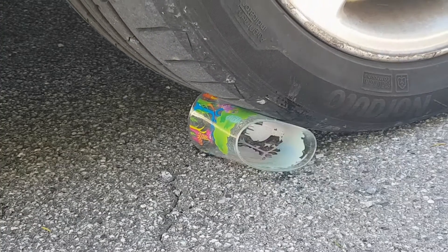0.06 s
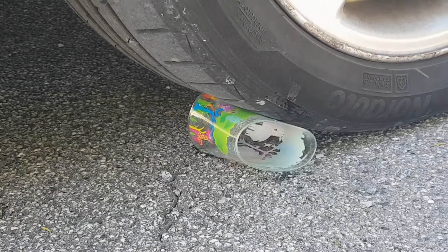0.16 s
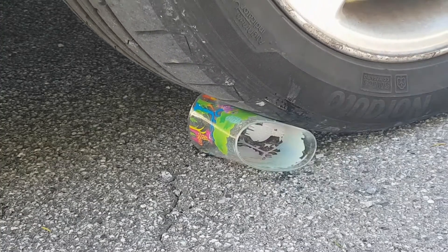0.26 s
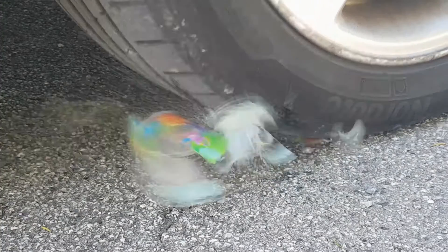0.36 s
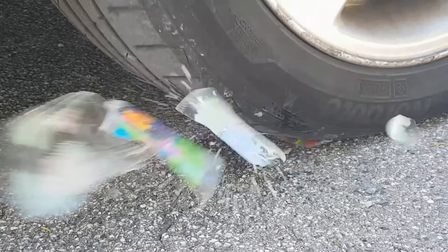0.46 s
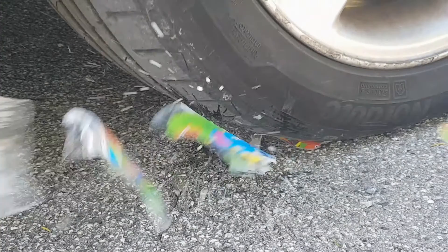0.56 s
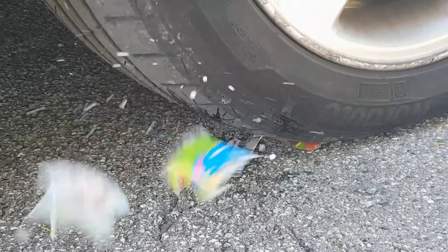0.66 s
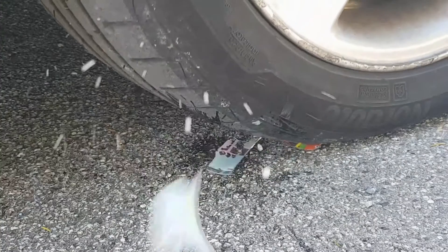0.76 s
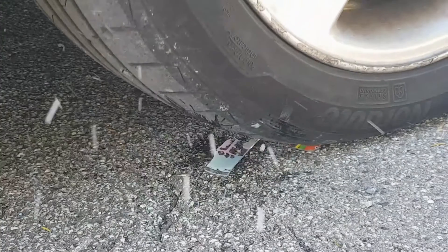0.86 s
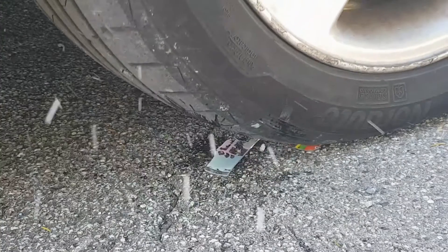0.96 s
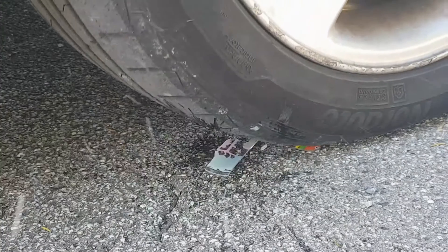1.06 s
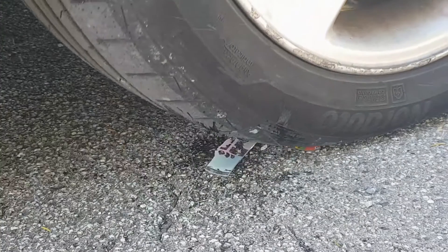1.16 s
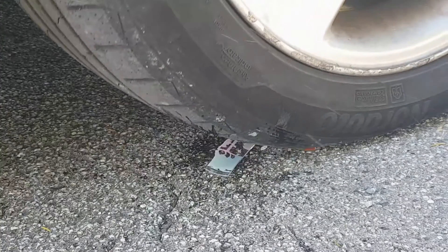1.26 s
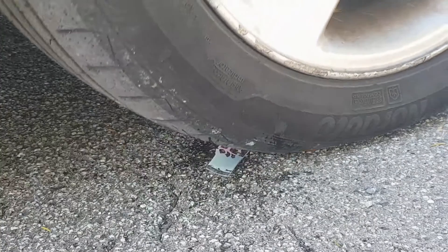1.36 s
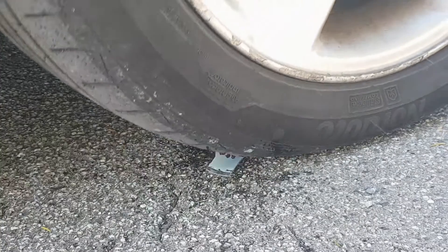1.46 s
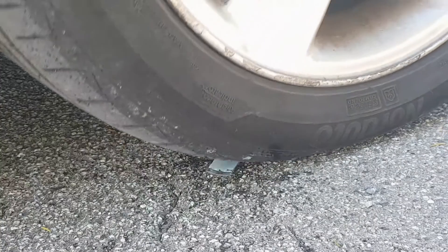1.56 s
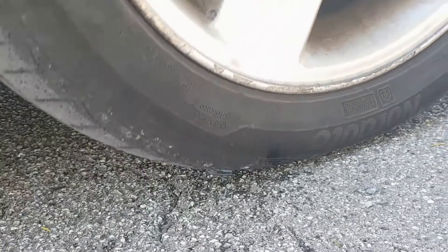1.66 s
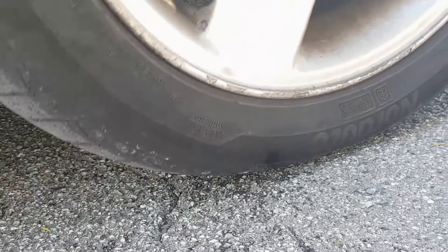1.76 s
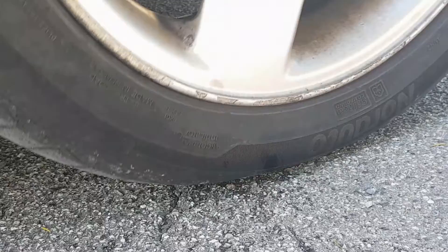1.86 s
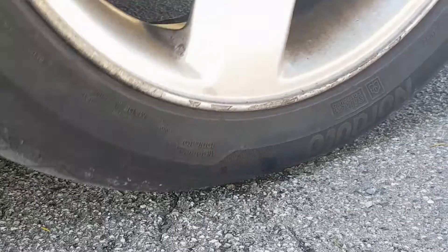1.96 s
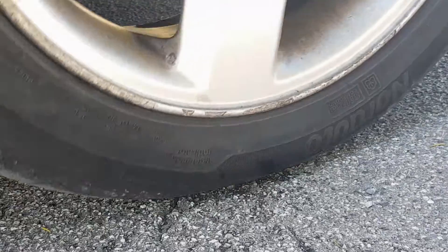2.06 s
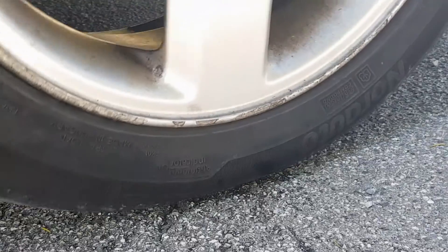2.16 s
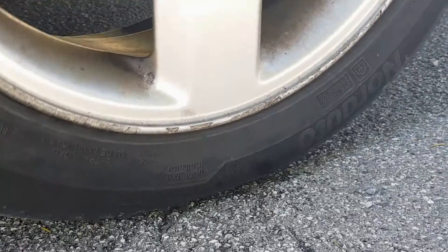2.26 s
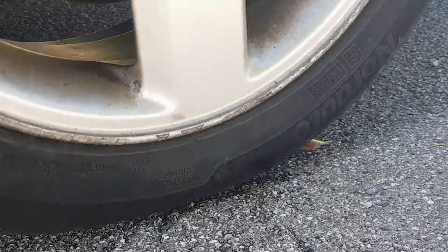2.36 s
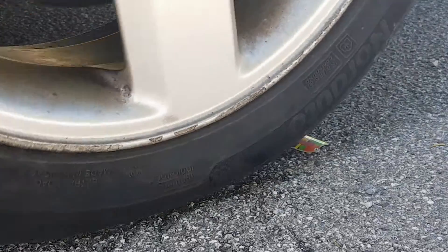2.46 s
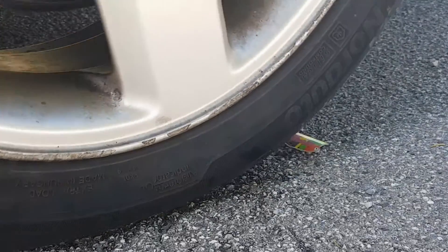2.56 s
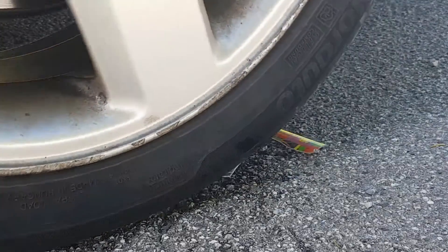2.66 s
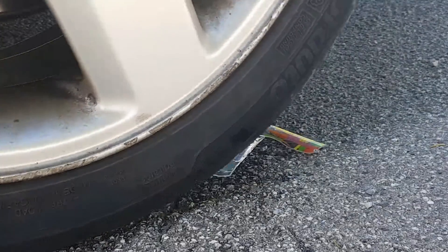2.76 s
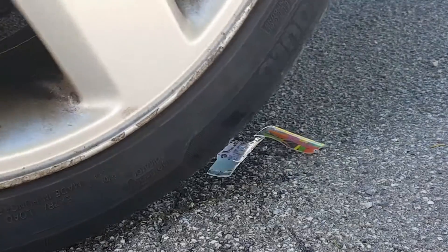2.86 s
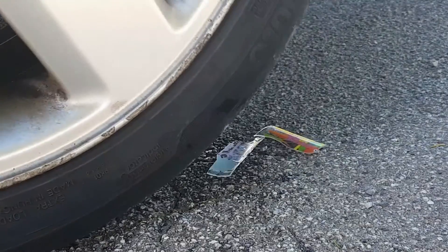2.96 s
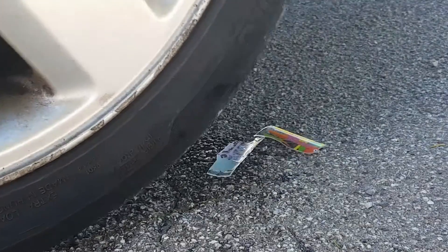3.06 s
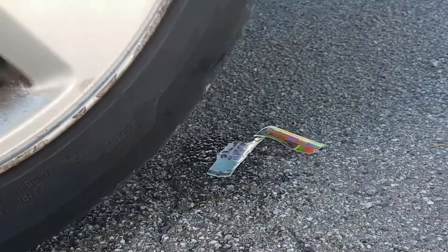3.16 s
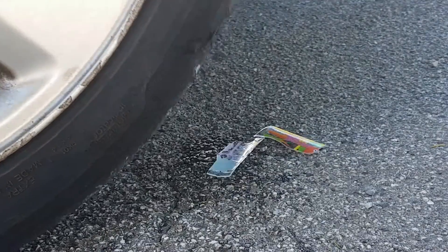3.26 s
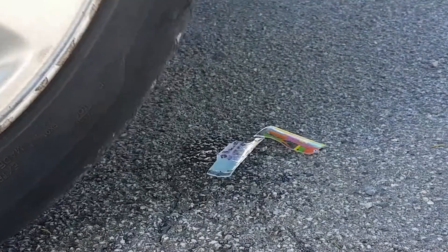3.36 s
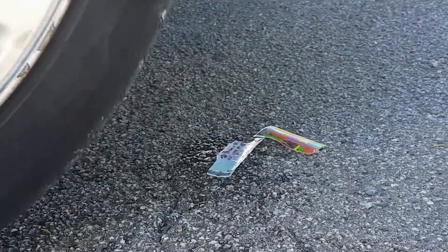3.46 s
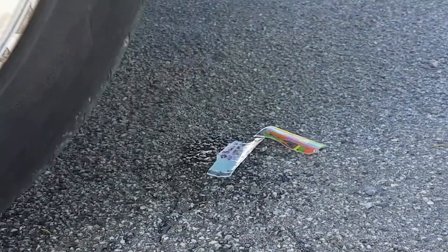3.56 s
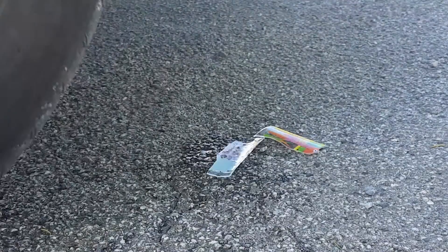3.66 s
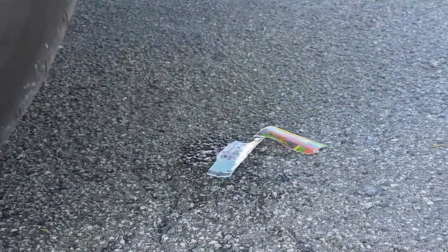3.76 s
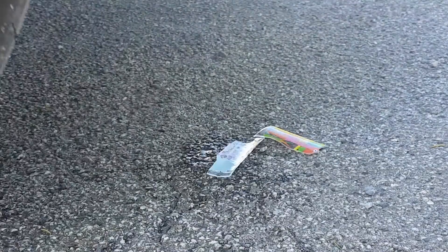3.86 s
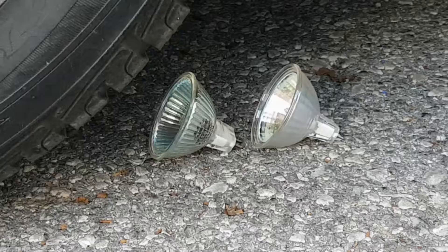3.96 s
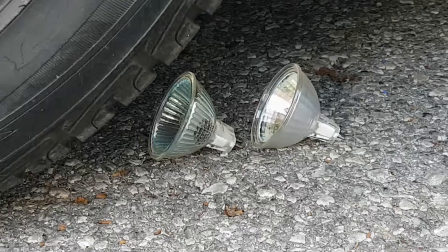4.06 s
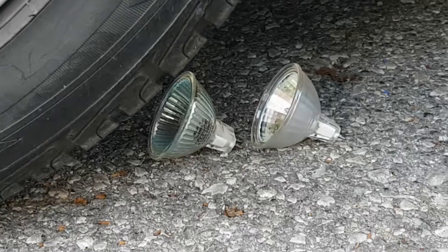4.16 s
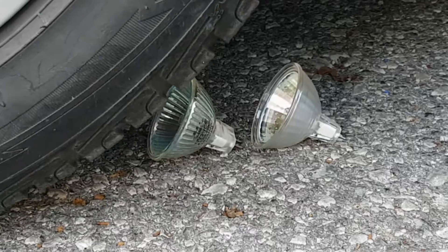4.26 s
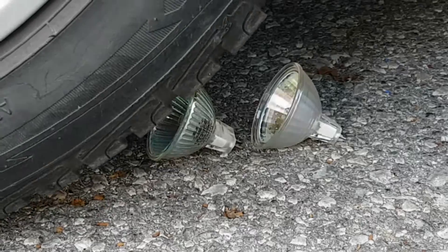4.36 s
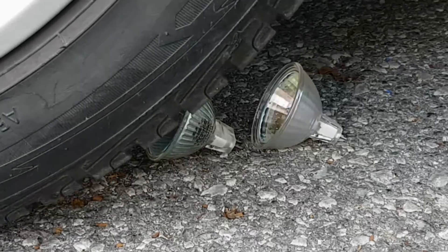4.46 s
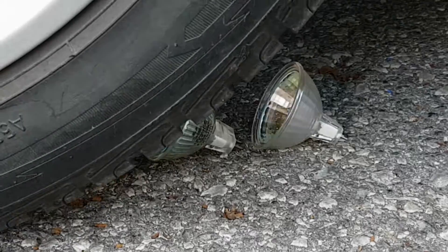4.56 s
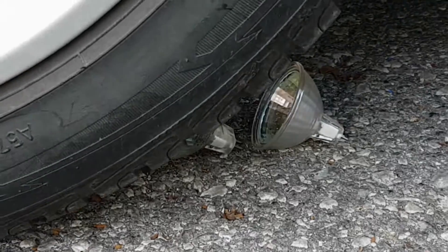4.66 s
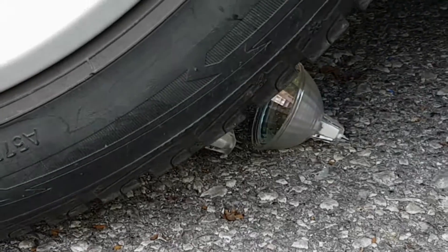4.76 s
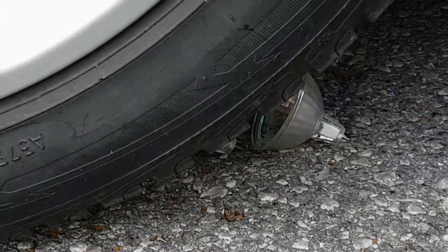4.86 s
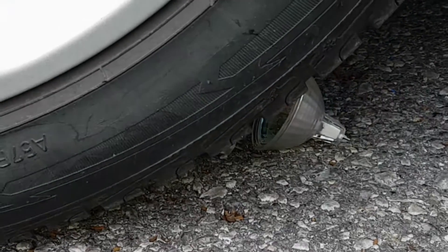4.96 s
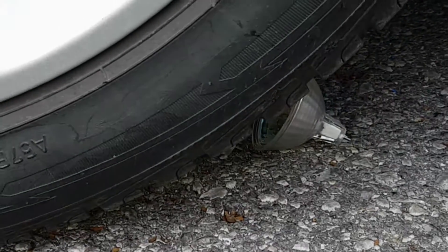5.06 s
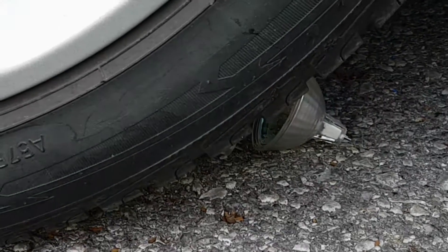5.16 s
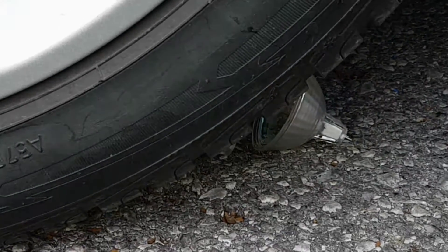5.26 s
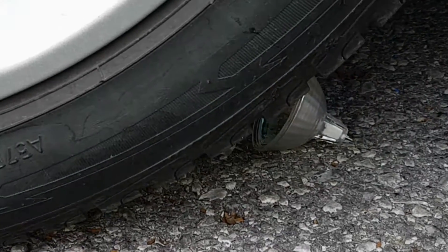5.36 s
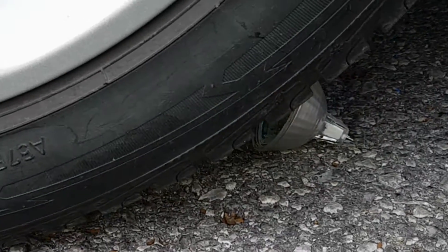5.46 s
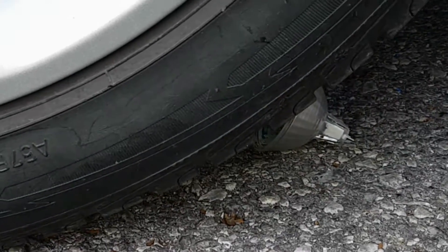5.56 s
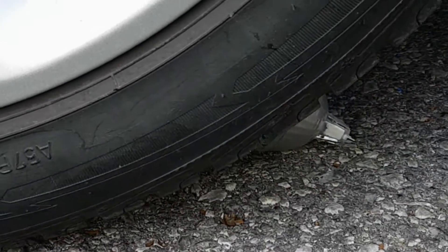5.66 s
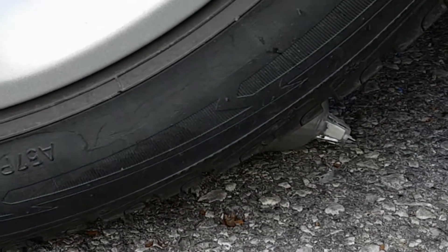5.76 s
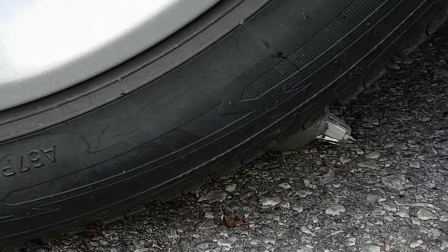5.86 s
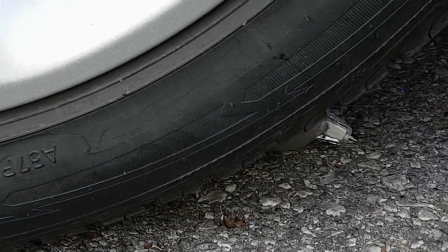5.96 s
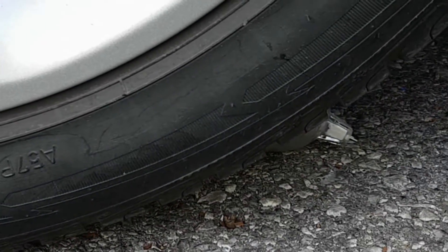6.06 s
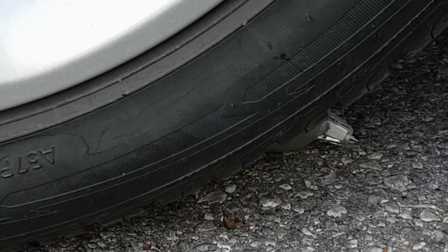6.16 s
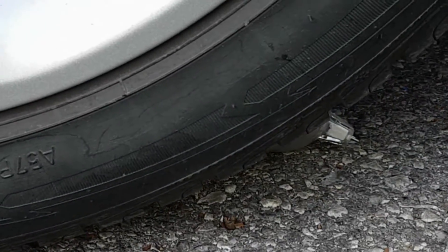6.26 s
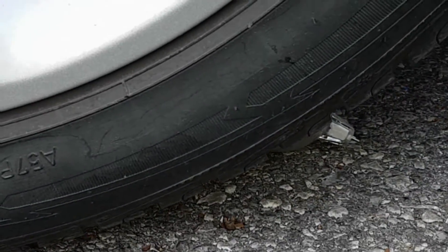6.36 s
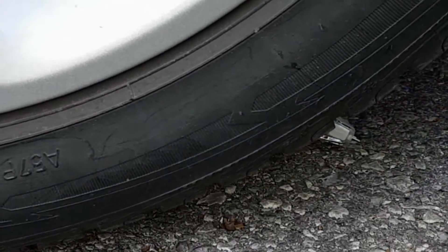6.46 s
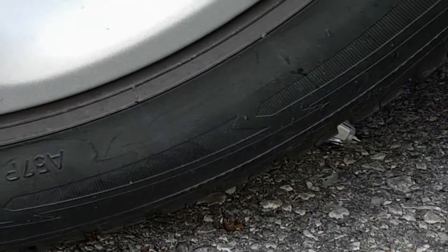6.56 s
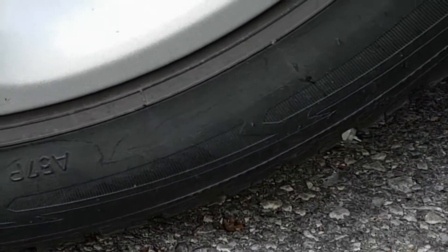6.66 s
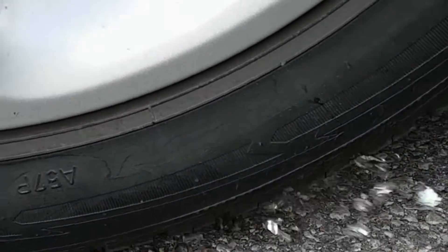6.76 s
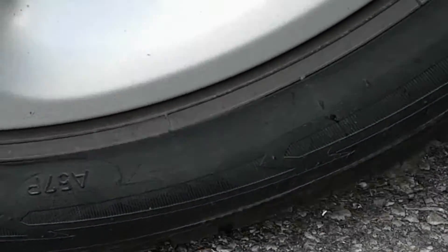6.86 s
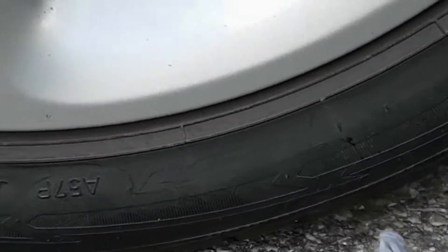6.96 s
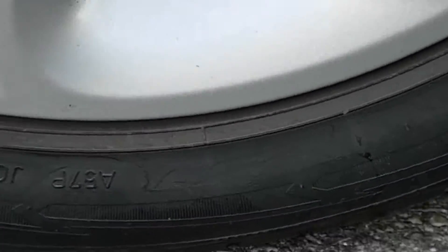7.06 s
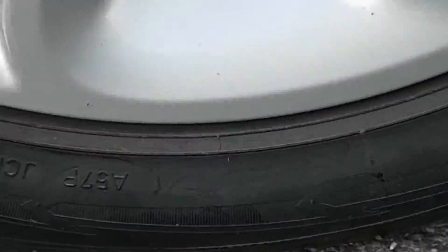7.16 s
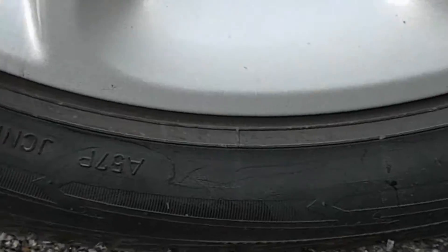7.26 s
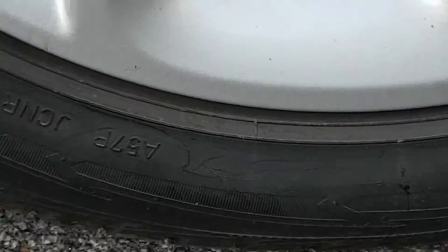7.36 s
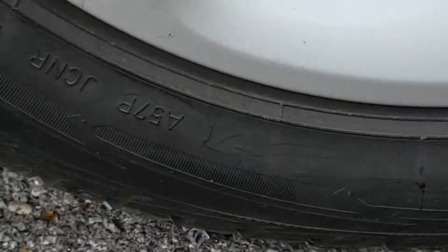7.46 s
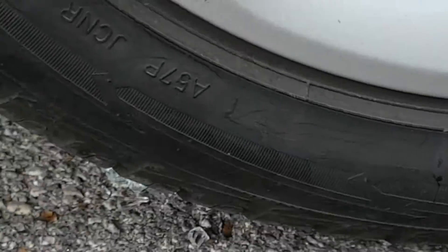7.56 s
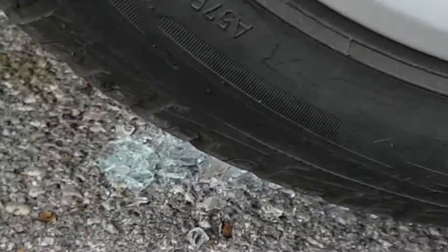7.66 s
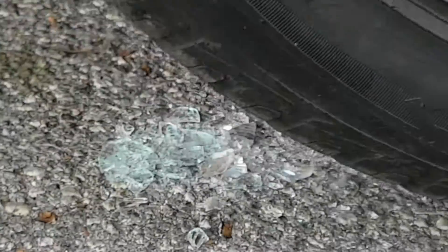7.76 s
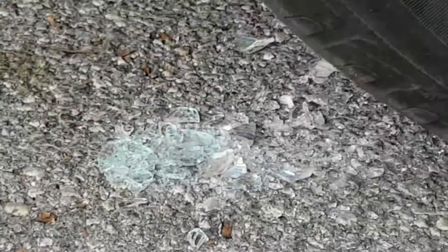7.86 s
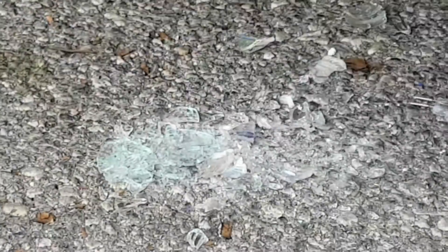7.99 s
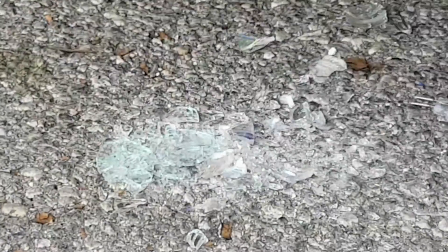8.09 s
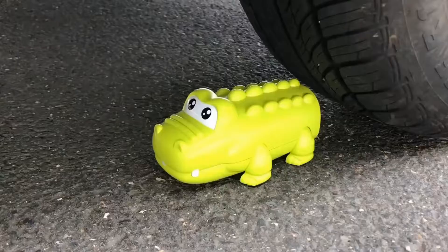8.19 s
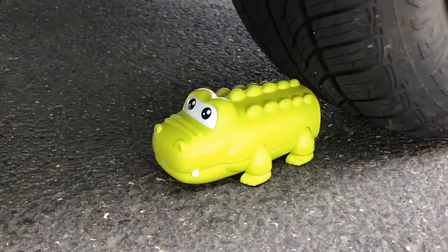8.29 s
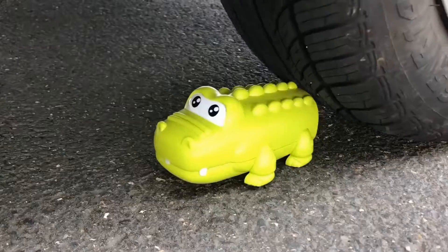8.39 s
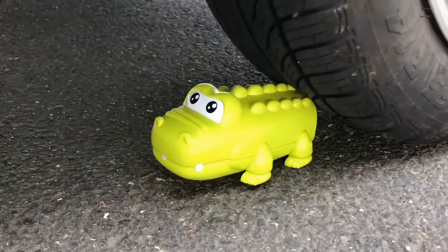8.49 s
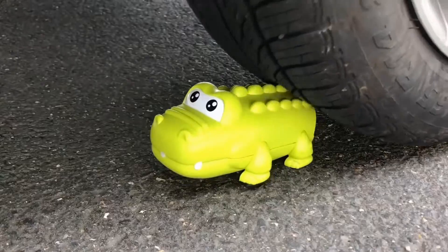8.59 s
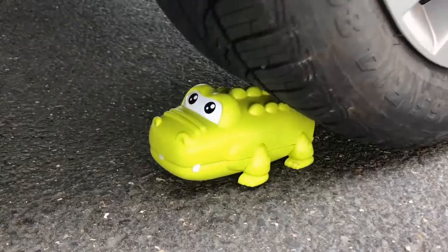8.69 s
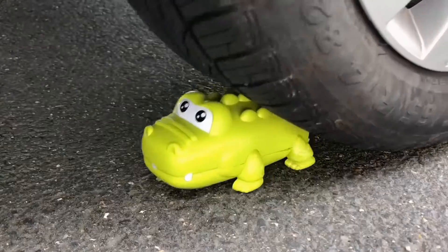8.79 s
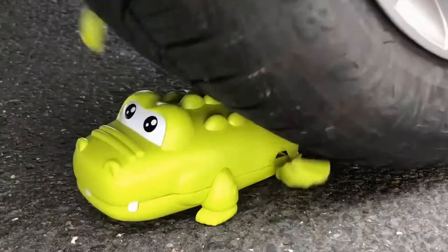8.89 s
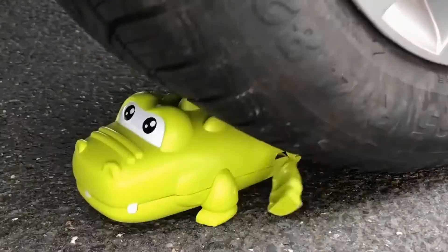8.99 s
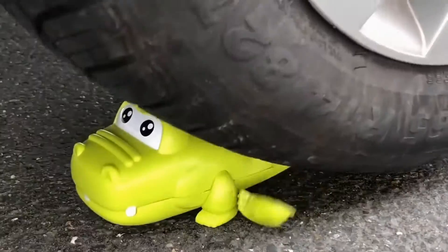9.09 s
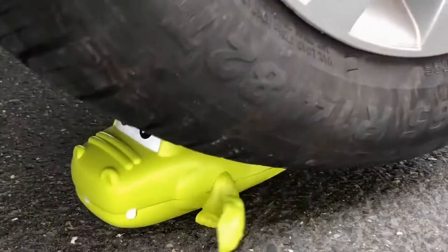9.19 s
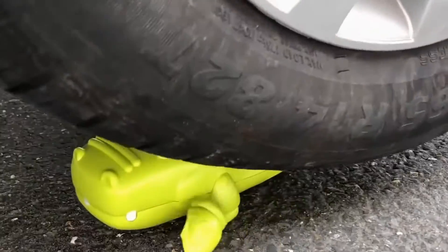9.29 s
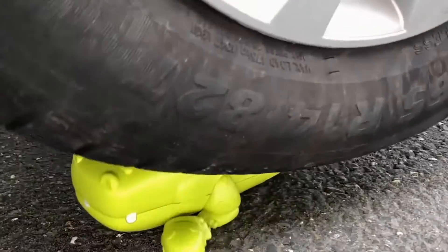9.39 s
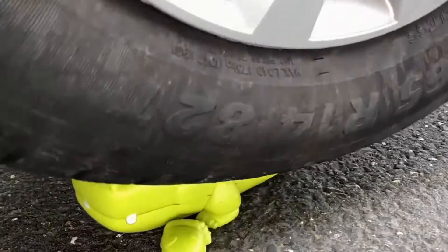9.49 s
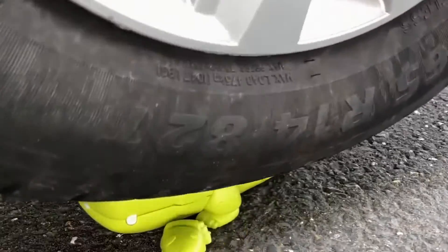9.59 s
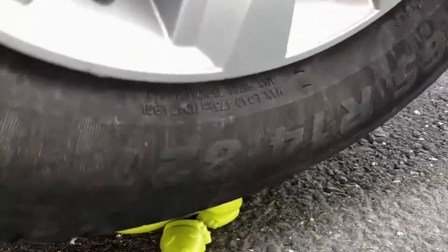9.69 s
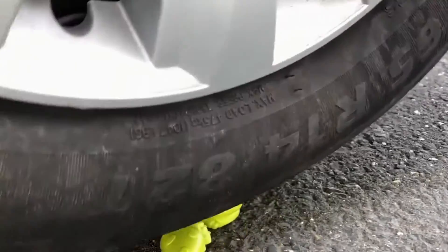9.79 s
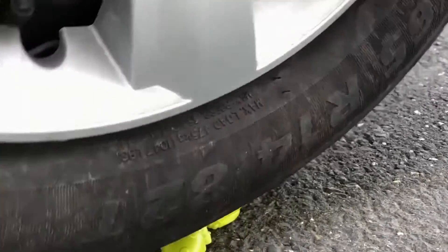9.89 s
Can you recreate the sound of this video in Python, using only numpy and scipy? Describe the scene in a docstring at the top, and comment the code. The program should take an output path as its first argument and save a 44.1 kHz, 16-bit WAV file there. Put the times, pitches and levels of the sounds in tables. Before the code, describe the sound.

A car tyre shatters a drinking glass and grinds its shards, pops two glass lamp reflectors beside an idling engine, then cracks a hollow plastic toy.

```python
"""A car tyre rolls slowly over things laid on asphalt, in three scenes.
First a drinking glass shatters: dense noise fractures, ringing pieces; its shards are ground under a groaning tread.
Then, beside an idling engine of firing tones and filtered noise, two glass lamp reflectors
pop as muffled noise bursts and squeal as wavering sines.
Last, in mono, a hollow plastic toy cracks, crumples and bursts: noise snaps ring the modes of its shell."""
import sys
import numpy as np
from scipy import signal
from scipy.fft import rfft, irfft
from scipy.io import wavfile

SR = 44100
rng = np.random.default_rng(int(sys.argv[2]) if len(sys.argv) > 2 else 0)


def dump_mix(stems):
    """Bounce the given channels to the path in sys.argv[1] as a 16-bit WAV at rate SR."""
    frames = np.atleast_2d(stems).T  # one column per channel
    limited = np.clip(frames, -1, 1)  # hard clip at full scale
    pcm = np.round(limited * 32767).astype(np.int16)
    wavfile.write(sys.argv[1], SR, pcm)


N = 437913
TIME = np.arange(N) / SR
LAMPS_START_S, TOY_START_S = 4.027, 8.31
CUTOFF_HZ = 16000

# All level_db columns are relative: the mix adds offsets.
# Glass wall strains, snaps, pours down, settles: start_s, level_db, attack_s, hold_s, release_s
WALL_BREAK = [(0.345, -31.5, 0.067, 0.026, 0.11), (0.387, -14, 0.066, 0.0036, 0.13),
              (0.42, -23.5, 0.2, .06, 0.24), (0.56, -42.5, .2, 0.064, 0.45)]
# Thick base grinds, then snaps: start_s, level_db, attack_s, hold_s, release_s
BASE_BREAK = [(1.13, -44, 0.18, 0.19, 0.52), (1.241, -21, 0.19, 0.00281, 0.058)]
# Spectrum of the breaking wall: freq_hz, density_db (per Hz)
SHATTER_COLOUR = [(200, -9.5), (400, -3.5), (980, -5.5), (1230, -0.5), (1550, -5), (2300, -9),
                  (3600, -13.5), (5000, -22), (7700, -13), (10000, -29), (13000, -15), (16000, -24)]
# Spectrum of the breaking base: freq_hz, density_db (per Hz)
BASE_COLOUR = [(200, -25.5), (650, 1), (1150, -1.5), (2000, -2), (3000, 6.5), (4600, -29.5), (6500, -4.5),
               (9000, -22), (16000, -18.5)]
# Largest glass pieces, resonances: freq_hz, width_hz, level_db
PIECES = [(486, 48, -5.5), (647.5, 8.3, 0.5), (1213, 40, 3.5), (1316, 60, 0), (2064, 70, -4),
          (3660, 94, -5.5)]
# Pieces spring free, then land: start_s, level_db, attack_s, hold_s, release_s
PIECE_RINGING = [(0.385, -23, .1, .07, .28), (0.575, -41, .1, .04, .42)]
# Single shards giving way: centre_s, level_db, pitch_hz, length_s
CHINKS = [(0.228, -53, 5450, 0.0083), (0.944, -54, 5160, 0.0056), (1.402, -32.5, 2900, 0.0022),
          (1.428, -31.5, 2970, 0.0034), (2.225, -36, 1860, 0.012), (2.33, -35.5, 2100, 0.0046),
          (2.56, -44, 7000, 0.01)]
# Tyre drops on to the road: start_s, level_db, attack_s, hold_s, release_s, pitch_hz
DROPS = [(0.405, -38.5, 0.15, 0.03, 0.2, 73.9), (0.49, -34.5, 0.19, 0.025, 0.26, 142.2),
         (0.685, -46, 0.17, 0.018, 0.23, 235), (1.225, -37, 0.25, 0.013, 0.14, 232)]
DROP_OCTAVES_PER_S = 7
# Rubber groaning on the road: time_s, pitch_hz, level_db
GROAN = [(0.2, 738, -54.5), (0.899, 760, -74), (1.351, 876, -47), (1.621, 829.6, -76), (2.205, 820, -37.5),
         (2.492, 817.6, -32.5), (2.57, 745, -45), (3.6, 627, -40.5), (3.97, 624, -79.5)]
# Groan cluster: pitch_ratio, level_db
GROAN_TONES = [(0.72, -9), (1, 1.5), (1.2, -5)]
# Tread creeping against the glass, two spans: time_s, rumble_db, hiss_db
CREEP = [
    [(0.0, -49.5, -57), (0.26, -55.5, -60.5), (0.28, -54, -68)],
    [(0.82, -70.5, -75), (0.928, -59.5, -61), (1.06, -62.5, -74)],
]
# Tread rolling off over grit: time_s, rumble_db, hiss_db
ROLL = [(1.47, -54, -54.5), (1.64, -62.5, -63.5), (2.189, -44, -47), (2.21, -41, -44.5), (2.57, -36, -38),
        (2.6, -40, -42.5), (3.53, -38.5, -41), (3.75, -55, -56.5), (3.97, -83, -77.5)]
# Spectrum of the rolling grit: freq_hz, density_db (per Hz)
ROLL_COLOUR = [(30, -25.5), (60, -14), (180, -15.5), (600, -13), (1100, -18), (1850, -14.5), (3200, -17),
               (4900, -24.5), (10000, -33), (16000, -31.5)]
# Two faint whistles in the roll: freq_hz, width_hz, level_db
ROLL_RINGS = [(6379, 30, -20), (8040, 60, -21)]
HUM_DB, HUM_FOLLOWS = -15, .75   # squeezed tyre; share of the rumble's dB swing followed
TYRE_CAVITY_HZ = 245.5
ROAD_PAN_DB = -1.8

# Reflectors breaking under rubber: start_s, knock_db, boom_db, pitch_hz (of the piece)
POPS = [(6.739, -19.5, -23.5, 714), (6.7915, -6, -20.5, 600), (6.817, -24, -25.5, 1420),
        (6.837, -45, -28.5, 560), (6.883, -23.5, -42, 874), (6.931, -9.5, -22, 740), (7.005, -33, -37, 793),
        (7.041, -12.5, -36.5, 1390), (7.096, -27, -51, 1290), (7.159, -8.5, -25, 680),
        (7.204, -33, -34.5, 1000), (7.311, -33, -45.5, 1060), (7.34, -27.5, -44, 1140),
        (7.378, -14.5, -38.5, 1200), (7.468, -11, -40, 990), (7.493, -19.5, -39.5, 870),
        (7.547, -29, -58, 2000)]
# Spectrum of a pop: freq_hz, density_db (per Hz)
POP_COLOUR = [(50, -6), (220, 9.5), (400, -1.5), (750, -3), (2000, -4.5), (3000, -5.5), (6000, -21.5),
              (16000, -27)]
POP_RISE_S, POP_T60_S, POP_LEAD_S = .0025, .039, .1   # rubber softens the onset; lead = crunch before
EDGE_HZ, SPLINTER_HZ = 10013, 13900   # the two pitches at which glass sings
# Glass edges rubbing: centre_s, pitch_hz, level_db, length_s
SQUEALS = [(6.796, EDGE_HZ, -36, 0.0068), (6.839, EDGE_HZ, -52, .02), (6.89, SPLINTER_HZ, -10, 0.005),
           (6.896, EDGE_HZ, -38, 0.018), (7.063, EDGE_HZ, -40.5, 0.0042), (7.076, SPLINTER_HZ, -38, 0.013),
           (7.232, SPLINTER_HZ, -38, .006), (7.256, EDGE_HZ, -44.5, 0.024),
           (7.344, SPLINTER_HZ, -40, 0.006)]
SQUEAL_RING_DB, SQUEAL_T60_S = -38, .3   # rubber damps any louder ring; the rest dies slowly
# First reflector grinds into the road: start_s, level_db, attack_s, hold_s, release_s
GRINDS = [(4.325, -33.5, 0.099, 0.0064, 0.092), (4.385, -38, 0.073, 0.02, 0.22)]
GRIT_DB = -47   # under the creeping tread
# Spectrum of the engine body: freq_hz, density_db (per Hz)
IDLE_COLOUR = [(25, -7), (45, 1), (125, 1), (205, -8), (290, -4), (450, 0), (600, -5), (850, -3),
               (1350, -18.5)]
# Spectrum of the fan: freq_hz, density_db (per Hz)
FAN_COLOUR = [(1000, 4.5), (2300, 1.5), (3900, -4.5), (4700, -20), (5600, -11.5), (6900, -8.5), (8200, -17),
              (9600, -33.5), (12800, -10.5), (16000, -27)]
# Engine bay resonances: freq_hz, width_hz, level_db
IDLE_RINGS = [(278, 27.8, -10.5), (1190, 29, -20), (1303, 37, -14), (1443, 42, -17.5)]
FIRING_HZ = 41.3   # mean
# Engine tones: firing_multiple, level_db
ORDERS_DB = [(1, -17), (2, -12), (3, -17)]
# Valve ticking: time_s, level_db
VALVES = [(4.15, -44), (4.9, -50), (6.1, -47), (6.4, -41), (6.8, -44), (7.4, -70)]
# Engine covers rung by the valves: freq_hz, width_hz, level_db
VALVE_RINGS = [(2406, 430, -2), (3120, 260, 2), (3760, 150, -1.5), (6800, 210, -8.5)]
VALVE_TAP_S = .006
WHIRR_HZ, WHIRR_DB = 159, -8   # low whirr in the engine bay
IDLE_DB, IDLE_FADE_S, IDLE_RELEASE_S = -38, 6.83, 1.23   # release = time to fall 60 dB
FAN_DB, FAN_FADE_S, FAN_RELEASE_S = -41.5, 6.78, 2.2
IDLE_END_S, QUIET_DB = 7.6, -82   # then a faint background is left

# Plastic cracking: start_s, level_db, pitch_hz (of the piece), treble_db
CRACKS = [(8.451, -13.5, 4130, -42), (8.508, -18.5, 1380, -49), (8.525, -14.5, 1580, -46),
          (8.54, -23, 3200, -50), (8.627, -5, 1090, -47), (8.637, -17, 1280, -45),
          (8.643, -15.5, 1100, -47), (8.658, -20.5, 1670, -48), (8.799, 9.5, 3600, 0),
          (8.904, -26, 8950, -17.5), (8.9298, -10, 3400, -14.5), (8.9419, -4.5, 2900, -11),
          (8.96, 4, 4900, -8.5), (8.966, -8, 5200, -11.5), (8.976, -12, 7400, -20), (9.1327, -8, 2530, -50),
          (9.1744, -15, 1970, -50), (9.1812, -23, 3860, -22), (9.2911, 1.5, 2030, -40),
          (9.723, -1, 4660, -10), (9.827, 2, 3200, -3.5), (9.8675, -2, 2300, -12)]
# Spectrum of a crack: freq_hz, density_db (per Hz)
CRACK_COLOUR = [(200, -35), (700, 14), (1800, -34), (3200, 15), (6000, 6), (9800, -28), (12000, -27.5),
                (16000, -26)]
# Spectrum of the hollow body: freq_hz, density_db (per Hz)
HOLLOW_COLOUR = [(60, -6), (150, -2), (450, 5.5), (1200, -3.5), (2500, 2), (8000, -51.5)]
CRACK_T60_S, CRACK_DOUBLING_DB = .013, 53   # t60 at 0 dB; one this much weaker lasts twice as long
HOLLOW_DB, FLAP_DB, SNAP_LOW_HZ = -4.5, -3, 550   # hollow body; ringing loose flaps; low cut
# Modes of the toy's shell: freq_hz, level_db, t60_s
TOY_MODES = [(2660, -6, 0.043), (3700, -4.5, 0.048), (4280, -8.5, 0.021), (5160, -6, 0.031),
             (6490, -1, 0.023)]
SHELL_DB_PER_OCTAVE = 13   # modes far from the pitch of a blow ring less
# Belly bursts, air resonances: freq_hz, level_db, t60_s
BELLY = [(362, 9.5, 0.01), (171, -15.5, 0.071), (510, -6.5, 0.032)]
BURST_S = 9.7648
# Broken flaps flick past each other: start_s, level_db, pitch_hz
TICKS = [(9.027, -31, 6400), (9.052, -38, 5000), (9.064, -27.5, 5400), (9.242, -27, 4440),
         (9.255, -21.5, 4360), (9.497, -17.5, 6350), (9.509, -12, 5200), (9.551, -21, 5850),
         (9.566, -29, 6400), (9.906, -40, 3900)]
# Brief swells of pitched crackle: start_s, level_db, attack_s, hold_s, release_s, pitch_hz
CRACKLES = [(8.783, -43, 1, 0.023, .05, 2060), (8.974, -28.5, .01, 0.017, 0.054, 3570),
            (9.27, -38, .02, 0.01, 0.036, 5300), (9.68, -42.5, 0.032, 0.0063, 0.056, 4930)]
# Toy shifts under the load: start_s, level_db, pitch_hz
BUMPS = [(8.318, -25, 93.7), (8.578, -19.5, 85), (8.981, -25, 182)]
BUMP_T60_S = .078
# Parts of the shell cave in: start_s, level_db, attack_s, hold_s, release_s
CAVE_INS = [(8.51, -31, 0.3, 0.012, 0.094), (8.937, -24.5, 0.019, 0.043, 0.063),
            (9.69, -43, 0.98, 0.18, 0.15)]
# Spectrum of rubber pressing plastic: freq_hz, density_db (per Hz)
PRESS_COLOUR = [(25, 0.5), (60, 2), (115, 3.5), (200, -5.5), (330, -12), (2100, -14.5), (4200, -21.5),
                (7500, -33), (16000, -52)]
# Hum of the tread blocks, following the wheel's speed: time_s, pitch_hz
TREAD = [(8.33, 80.3), (8.46, 74.7), (8.662, 106), (8.954, 131.3), (9.112, 109.4), (9.366, 68.9),
         (9.49, 114), (9.92, 112.3)]
SHORT_BLOCKS_RATIO, SHORT_BLOCKS_DB = 1.45, -7   # shorter blocks hum higher
# strain builds until the toy's back splits, then drops to a light rub
SPLIT_S, STRAIN_DB, STRAIN_ATTACK_S, STRAIN_RELEASE_S = 8.79, -29, 1.63, .074
STRAIN_RUB_DB, SLACK_RUMBLE_DB, SLACK_RUB_DB = -2.5, -51, -54.5


def glass_crunch(stages, colour, tinkle, per_s, tinkle_db, crunch_db, splinter_db, pan_db):
    """An avalanche of fractures that come in clumps, with tinkling splinters."""
    fractures = grains(per_s, spread_db=3, smooth_db=-15) * from_db(2.5 * drift(300))
    glass = coloured(fractures, colour) + from_db(tinkle_db) * tinkle
    glass = low_and_high(glass, 4000, from_db(crunch_db), from_db(splinter_db))
    return panned(swells(stages) * glass, pan_db)


def shards(count=48):
    """A spray of splinters tinkles, each ringing briefly at a pitch of its own."""
    out = np.zeros((2, N))
    pitches_hz = np.geomspace(1800, 15000, count) * rng.uniform(.97, 1.03, count)
    for k, hz in enumerate(pitches_hz):
        strikes = rng.random(N) < 45 / SR
        out[k % 2] += ring(strikes, hz, .03) * (hz / 1800) ** -.6
    return rms_one(out)


def large_pieces():
    """The halves of the wall ring as they come free, and again as they land."""
    return swells(PIECE_RINGING) * rms_one(resonances(rng.standard_normal((2, N)), PIECES))


def chinks():
    """A shard crumbles in a short swell of noise around its own pitch."""
    out, t = np.zeros((2, N)), np.arange(SR // 5) / SR
    middle_s = t.mean()
    for s, db, hz, length_s in CHINKS:
        noise = rng.standard_normal((2, len(t)))
        shard = resonate(noise, hz, hz * .35) + from_db(-19) * cut(noise, 900, "high")
        add(out, s - middle_s, from_db(db) * shard / np.cosh((t - middle_s) / length_s * .94))
    return out


def pops():
    """Glass breaks muffled by rubber: a crunch leads to a brief crack, the air in the tyre booms on."""
    out, t = np.zeros((2, N)), np.arange(SR // 3) / SR
    for s, knock_db, boom_db, piece_hz in POPS:
        # the glass goes in uneven steps
        fractures = from_db(4 * rms_one(cut(rng.standard_normal(len(t)), 300, "low")))
        noise = coloured(fractures * rng.standard_normal((2, len(t))), POP_COLOUR)
        boom = from_db(boom_db + 10.5) * rms_one(cut(noise, 510, "low"))
        boom = boom * burst(t, .0041, POP_T60_S * 2.43, -30, .3)
        cavity = from_db(boom_db - 4) * resonate(noise, TYRE_CAVITY_HZ, 34) * burst(t, .0045, .24, -18, .7)
        piece = rms_one(cut(cut(noise, 420, "high"), 2230, "low"))
        piece = rms_one(piece + from_db(4) * resonate(noise, piece_hz, 300))
        knock = from_db(knock_db + 6.5) * piece * burst(t, POP_RISE_S, POP_T60_S, -29.5, .33)
        splinters = rms_one(cut(noise, 2200, "high"))
        # small breaks are brighter
        crack = from_db(.55 * knock_db - 15) * splinters * burst(t, .0011, POP_T60_S, -23, .3)
        lead = from_db(knock_db - 20) * (piece + splinters) * swell(t[-1], POP_LEAD_S, 0, 1, t)
        add(out, s - t[-1], panned(lead, -3.5))
        add(out, s, panned(boom + cavity + knock + crack, -2.4))
    return out


def squeals():
    """A glass edge slips on glass, sings very high and rings out."""
    out, t = np.zeros((2, N)), np.arange(-SR // 20, SR // 5) / SR
    for s, hz, db, length_s in SQUEALS:
        slip = np.exp(-(t / length_s) ** 2)
        ring_db = min(db - 9, SQUEAL_RING_DB) - db
        after = from_db(ring_db - 60 * np.abs(t) / SQUEAL_T60_S) * (t > 0)
        waver_hz = 55 * rms_one(cut(rng.standard_normal(len(t)), 90.5, "low"))
        tone = np.sqrt(2) * np.sin(2 * np.pi * np.cumsum(hz + waver_hz) / SR)
        add(out, s + t[0], panned(from_db(db) * np.maximum(slip, after) * tone, -8))
    return out


def cracks():
    """Each crack rings the breaking piece, hollow body and shell modes, with a bright tearing edge."""
    out, t = np.zeros((1, N)), np.arange(SR // 5) / SR
    for s, db, hz, treble_db in CRACKS:
        t60_s = CRACK_T60_S * 2 ** (-db / CRACK_DOUBLING_DB)
        noise = rng.standard_normal((4, len(t)))
        snap = from_db(-3) * coloured(noise[0], CRACK_COLOUR)
        snap = snap + from_db(-.5) * resonate(noise[1], hz, hz * .17)
        snap = snap + from_db(HOLLOW_DB) * coloured(noise[2], HOLLOW_COLOUR)
        snap = cut(snap, SNAP_LOW_HZ, "high", order=3)
        edge = from_db(treble_db + 2) * rms_one(cut(cut(noise[3], 6600, "high", order=4), 8300, "low"))
        # hard cracks come under load, where the rubber damps the shell
        shell = shell_ring(t, hz) * from_db(-.5 * (db + 22))
        broken = (from_db(db - 2) * snap + edge) * burst(t, .00047, t60_s, -23.5, .063)
        add(out, s, broken + from_db(db - 18 + FLAP_DB) * shell)
    return out


def shell_ring(t, hz):
    """The toy's modes after one blow, strongest near hz; the shell is bent differently every time."""
    bend = 1 + .025 * rng.standard_normal()
    out = 0
    for mode_hz, db, t60_s in TOY_MODES:
        level_db = db + rng.normal(0, 2.6) - SHELL_DB_PER_OCTAVE * abs(np.log2(mode_hz / hz))
        decay = from_db(level_db - 60 * t / t60_s)
        out = out + rng.choice([-1, 1]) * decay * np.sin(2 * np.pi * mode_hz * bend * t)
    return out


def belly_burst():
    """The trapped air escapes in one soft puff and thumps in the shell."""
    puff = np.exp(-((TIME - BURST_S) / .00044) ** 2)
    thump = sum(from_db(db) * ring(puff / puff.sum(), hz, t60_s) for hz, db, t60_s in BELLY)
    since_s = np.maximum(TIME - BURST_S, 0)
    leak = from_db(-24.5) * rms_one(cut(rng.standard_normal(N), 3000, "low", order=1))
    return thump + leak * burst(since_s, .0005, .015, -38, .084)


def flap_ticks():
    """A broken flap slips free: a tiny click, then the shell rings clearly."""
    out, t = np.zeros((1, N)), np.arange(SR // 5) / SR
    for s, db, hz in TICKS:
        click = resonate(rng.standard_normal(len(t)), hz, 3000) * burst(t, .00042, .0093, -21.5, .17)
        # the flap keeps brushing its neighbour
        chatter = from_db(3 * rms_one(cut(rng.standard_normal(len(t)), 250, "low")))
        add(out, s, from_db(db) * chatter * (shell_ring(t, hz) + from_db(-13.5) * click))
    return out


def crackles():
    """Uneven random clicks over a faint hiss swell briefly through a broad resonance."""
    clicks = grains(per_s=420, spread_db=2.5, smooth_db=-12)[0]
    return sum(from_db(db) * swell(s, *shape) * resonate(clicks, hz, hz / 2)
               for s, db, *shape, hz in CRACKLES)


def tyre_drops():
    """The tyre thuds on to the road as the glass gives way; each thud sinks in pitch as it settles."""
    out = 0
    for s, db, *shape, hz in DROPS:
        pitch_hz = hz * 2 ** (-DROP_OCTAVES_PER_S * np.clip(TIME - s, -.1, .15))
        out = out + from_db(db) * swell(s, *shape) * wavering(pitch_hz, 30)
    return out


def bumps():
    """The toy's feet skid and the tread drops a little with a dull bump, a decaying sine."""
    out, t = np.zeros((1, N)), np.arange(SR // 5) / SR
    for s, db, hz in BUMPS:
        add(out, s, from_db(db) * swell(.01, .023, 0, BUMP_T60_S, t) * np.sin(2 * np.pi * hz * t))
    return out


def debris():
    """Coarse bits of glass and grit crackle under the tread as it creeps, grinds and crushes."""
    fractures = grains(per_s=170, spread_db=3.5, smooth_db=-9)
    crackle = coloured(fractures, SHATTER_COLOUR) * from_db(2.5 * drift(30))
    first_pop_s = POPS[0][0]
    crushing = from_db(-42) * swell(first_pop_s, .5, 0, 4) * (TIME < IDLE_END_S)
    creeping = from_db(GRIT_DB) * (TIME < first_pop_s) + swells(GRINDS)
    return panned(crushing * crackle + creeping * cut(crackle, 4000, "low", order=4), -1.5)


def groan():
    """Tread blocks stick and slip in a cluster of rough tones that sinks as the tyre rolls off."""
    s, hz, db = np.transpose(GROAN)
    pitch_hz = np.interp(TIME, s, hz)
    tones = sum(from_db(tone_db) * wavering(ratio * pitch_hz, 32) for ratio, tone_db in GROAN_TONES)
    return from_db(np.interp(TIME, s, db) + 1) * rms_one(tones)


def rolling():
    """Grit and glass dust crackle under the tread; the air in the tyre hums along."""
    rumble, hiss = gains(np.vstack([*CREEP, ROLL]))
    grit = under_car(grains(per_s=900, spread_db=4.5, smooth_db=0), echo_db=-13)
    grit = grit * from_db(.8 * drift(40))
    whistles = resonances(rng.standard_normal((2, N)), ROLL_RINGS) * from_db(2 * drift(10))
    road = coloured(grit, ROLL_COLOUR) + whistles
    road = low_and_high(road, 1100, from_db(-.5) * rumble, from_db(1.1) * hiss)
    hum = from_db(HUM_DB) * rumble ** HUM_FOLLOWS * wavering(TYRE_CAVITY_HZ, 14)
    return panned(hum + road, ROAD_PAN_DB)


def pressing():
    """The car rumbles and its tread hums, while the rubber rubs and crackles on the strained plastic."""
    strain = from_db(STRAIN_DB) * swell(SPLIT_S, STRAIN_ATTACK_S, 0, STRAIN_RELEASE_S)
    caving = swells(CAVE_INS)
    rumble = strain + caving + from_db(SLACK_RUMBLE_DB)
    rubbing = from_db(STRAIN_RUB_DB) * strain + from_db(-6.5) * caving + from_db(SLACK_RUB_DB)
    rubbing = rubbing * from_db(2.5 * drift(45))
    slips = grains(per_s=700, spread_db=3, smooth_db=-2)[0]
    rub = low_and_high(coloured(slips, PRESS_COLOUR), 320, from_db(-1.5) * rumble, rubbing)
    turn = 2 * np.pi * np.cumsum(np.interp(TIME, *np.transpose(TREAD))) / SR
    hum = np.sin(turn) + from_db(SHORT_BLOCKS_DB) * np.sin(SHORT_BLOCKS_RATIO * turn)
    hum = hum * from_db(2 * drift(16))
    return rub + (from_db(-3.5) * strain + from_db(-46)) * hum


def idling():
    """Firing orders and rumble from below, the hiss of the fan and the ticking of the valves."""
    running = swell(LAMPS_START_S, .01, IDLE_END_S - LAMPS_START_S, .34)
    # the engine works harder as the tyre climbs the second reflector
    load_db = np.interp(TIME, (5.7, 8), (-1, 2.5))
    rumble = from_db(IDLE_DB + load_db) * running * swell(0, 1, IDLE_FADE_S, IDLE_RELEASE_S)
    rumble = rumble + from_db(QUIET_DB)
    hiss = from_db(FAN_DB + .53 * load_db) * running * swell(0, 1, FAN_FADE_S, FAN_RELEASE_S)
    hiss = hiss + from_db(QUIET_DB - 2.5)
    turn = 2 * np.pi * np.cumsum(FIRING_HZ * (1 + .018 * drift(14))) / SR
    orders = 0
    for k, db in ORDERS_DB:
        tone = np.sqrt(2) * np.sin(k * turn + rng.uniform(0, 2 * np.pi, (2, 1)))
        orders = orders + from_db(db + 3 * drift(9)) * tone
    whirr = from_db(WHIRR_DB) * resonate(rng.standard_normal((2, N)), WHIRR_HZ, 4.2)
    bay = resonances(rng.standard_normal((2, N)), IDLE_RINGS)
    body = cut(coloured(rng.standard_normal((2, N)), IDLE_COLOUR) + bay, 1350, "low", order=4)
    body = body * from_db(1.8 * drift(13)) + orders + whirr
    air = under_car(grains(per_s=1500, spread_db=3.5, smooth_db=1), echo_db=-16)
    air = air * from_db(1.1 * drift(28))
    fan = cut(coloured(air, FAN_COLOUR) + bay, 1400, "high", order=4)
    low = from_db(4) * rumble * rms_one(body)
    high = from_db(1.5) * hiss * rms_one(fan) + running * valve_ticks(turn)
    return panned(low, -2.4) + panned(high, -6)


def valve_ticks(turn):
    """One tick per firing, each of its own strength, rings the engine's covers."""
    firing, phase = np.divmod(turn / (2 * np.pi), 1)
    strength = from_db(2.5 * rng.standard_normal(N))[firing.astype(int)]
    taps = strength * np.exp(-phase / FIRING_HZ / VALVE_TAP_S) * rng.standard_normal((2, N))
    return gains(VALVES)[0] * rms_one(resonances(taps, VALVE_RINGS))


def under_car(x, echo_db, count=18):
    """Short reflections between road, tyre and floor pan, different in each channel."""
    out = x.copy()
    for k in range(count):
        lag = int(rng.uniform(.002, .035) * SR)
        out[k % 2, lag:] += from_db(echo_db) * rng.choice([-1, 1]) * x[k % 2, :-lag]
    return out


def wavering(hz, flutter_hz):
    """A stick-slip tone whose pitch wanders and whose grip comes and goes; rms 1."""
    phase = 2 * np.pi * np.cumsum(hz * (1 + .04 * drift(16))) / SR
    grip = rms_one(cut(rng.standard_normal((2, 2, N)), flutter_hz, "low"))
    return rms_one(grip[0] * np.sin(phase) + grip[1] * np.cos(phase))


def grains(per_s, spread_db, smooth_db):
    """Random tiny clicks of uneven size over a smooth hiss, in two channels; rms 1."""
    sizes = from_db(spread_db * np.minimum(rng.exponential(1, (2, N)), 4))
    sizes = sizes * rng.choice([-1, 1], (2, N))
    clicks = rms_one(sizes * (rng.random((2, N)) < per_s / SR))
    return rms_one(clicks + from_db(smooth_db) * rng.standard_normal((2, N)))


def burst(t, rise_s, t60_s, tail_db, tail_t60_s):
    """Envelope of a break: a quick rise, a steep fall, then a faint tail from under the car."""
    fall = from_db(-60 * t / t60_s) + from_db(tail_db - 60 * t / tail_t60_s)
    return (1 - np.exp(-t / rise_s)) * fall


def swell(s, attack_s, hold_s, release_s, t=TIME):
    """Rises 60 dB over the attack up to time s, holds at 1, falls 60 dB over the release."""
    before = np.maximum(s - t, 0) / attack_s
    after = np.maximum(t - s - hold_s, 0) / release_s
    return from_db(-60 * (before + after))


def swells(rows):
    """The summed power of several swells, as a gain."""
    return np.sqrt(sum((from_db(db) * swell(s, *shape)) ** 2 for s, db, *shape in rows))


def drift(per_s):
    """Random wander: knots joined by lines, per_s knots a second; rms 1."""
    knots = rng.standard_normal(2000)
    return rms_one(np.interp(TIME * per_s, np.arange(len(knots)), knots))


def coloured(x, spectrum, size=4096):
    """Causal (minimum-phase) filter through the points of a spectrum; rms 1."""
    hz, db = np.transpose(spectrum)
    log_hz = np.log(np.maximum(np.arange(size // 2 + 1) * SR / size, 1))
    cepstrum = irfft(np.log(from_db(np.interp(log_hz, np.log(hz), db))))
    # fold the cepstrum forward in time: minimum phase
    cepstrum[1:size // 2] *= 2
    cepstrum[size // 2 + 1:] = 0
    response = irfft(np.exp(rfft(cepstrum)))
    return rms_one(signal.oaconvolve(np.atleast_2d(x), response[None], axes=1)[:, :x.shape[-1]])


def resonate(x, hz, width_hz):
    """One two-pole resonance; rms 1."""
    r = np.exp(-np.pi * width_hz / SR)
    poles = [1, -2 * r * np.cos(2 * np.pi * hz / SR), r * r]
    return rms_one(signal.lfilter([1, 0, -1], poles, x + 1e-18))


def resonances(x, table):
    """Resonances side by side, each at its own level."""
    return sum(from_db(db) * resonate(x, hz, width_hz) for hz, width_hz, db in table)


def ring(x, hz, t60_s):
    """A unit click sets a decaying sine of height 1 ringing."""
    r, w = from_db(-60 / (t60_s * SR)), 2 * np.pi * hz / SR
    return signal.lfilter([0, np.sin(w)], [1, -2 * r * np.cos(w), r * r], x + 1e-18)


def cut(x, hz, kind, order=2):
    """Butterworth low- or high-pass."""
    sos = signal.butter(order, np.clip(hz, 10, .45 * SR), kind, fs=SR, output="sos")
    return signal.sosfilt(sos, x)


def low_and_high(x, split_hz, low, high):
    """The two sides of a sound, each scaled to rms 1 and given its own gain."""
    below = rms_one(cut(x, split_hz, "low", order=4))
    above = rms_one(cut(x, split_hz, "high", order=4))
    return low * below + high * above


def from_db(db):
    """Decibels to gain."""
    return 10 ** (np.asarray(db) / 20)


def rms_one(x):
    """Scaled to rms 1."""
    return x / np.sqrt(np.mean(x ** 2) + 1e-20)


def gains(rows):
    """One gain curve per dB column."""
    s, *columns = np.transpose(rows)
    return [from_db(np.interp(TIME, s, column)) for column in columns]


def panned(x, pan_db):
    """Left louder than right by pan_db."""
    return x * from_db(np.array([[.5], [-.5]]) * pan_db)


def add(out, s, sound):
    """Mixes a short sound in at time s."""
    at = max(round(s * SR), 0)
    out[:, at:at + sound.shape[-1]] += sound[..., :N - at]


def scene():
    """Glass, lamp reflectors, toy in turn; the toy is mono."""
    tinkle = shards()
    wall = glass_crunch(WALL_BREAK, SHATTER_COLOUR, tinkle, per_s=3000, tinkle_db=-4,
                        crunch_db=1.5, splinter_db=-2, pan_db=-1.5)
    base = glass_crunch(BASE_BREAK, BASE_COLOUR, tinkle, per_s=1500, tinkle_db=-5.5,
                        crunch_db=1, splinter_db=-3.5, pan_db=-2)
    breaking = under_car(wall + base + large_pieces() + tyre_drops() + chinks(), echo_db=-18.5)
    glass = breaking + rolling() + groan()
    lamps = pops() + squeals() + debris() + idling()
    toy = cracks() + cut(belly_burst(), 96, "high") + flap_ticks() + crackles() + bumps() + pressing()
    return np.where(TIME < LAMPS_START_S, glass, np.where(TIME < TOY_START_S, lamps, toy))


def record(dry):
    """Soft overload rounds the loudest peaks; the top is cut."""
    top = .95
    low_pass = signal.ellip(10, .1, 80, CUTOFF_HZ, fs=SR, output="sos")
    return signal.sosfilt(low_pass, top * np.tanh(dry / top))


dry = scene()
out = record(dry)
dump_mix(out)
```